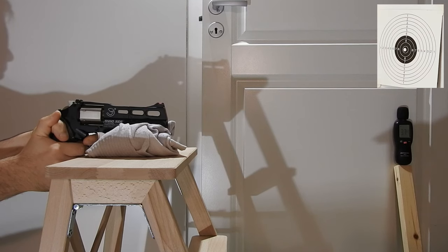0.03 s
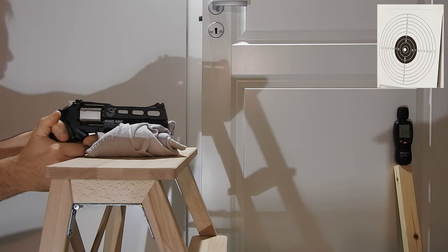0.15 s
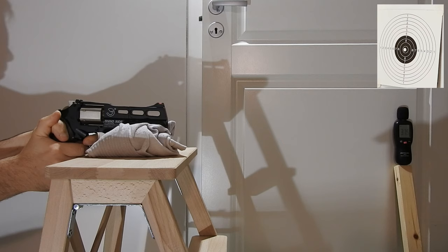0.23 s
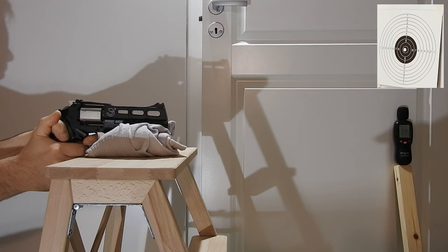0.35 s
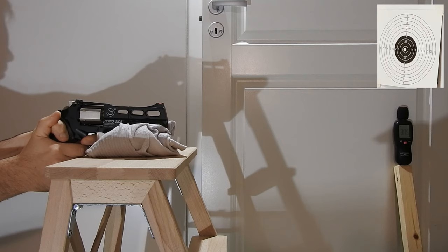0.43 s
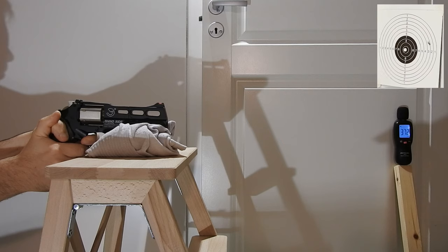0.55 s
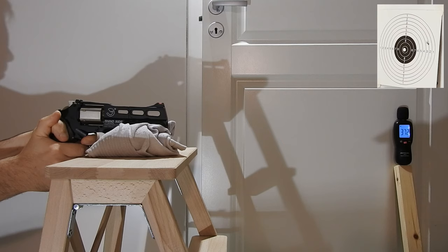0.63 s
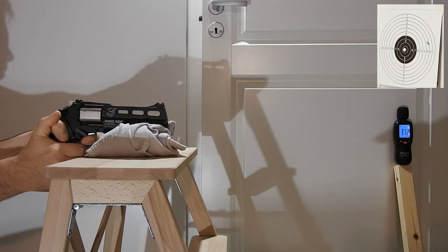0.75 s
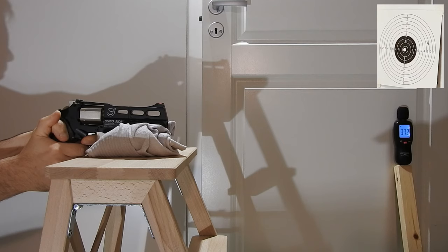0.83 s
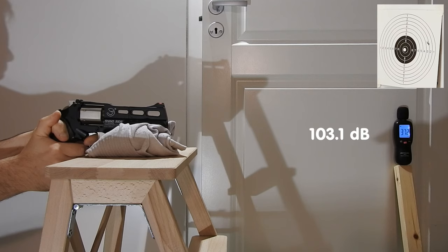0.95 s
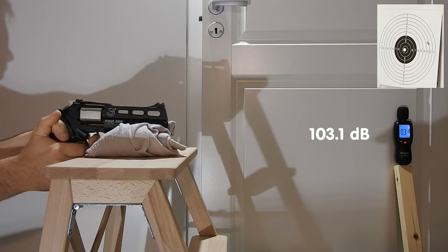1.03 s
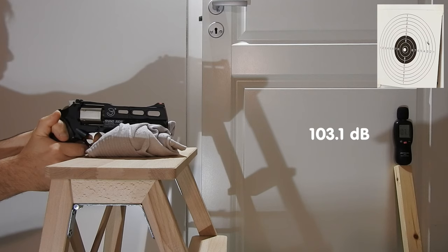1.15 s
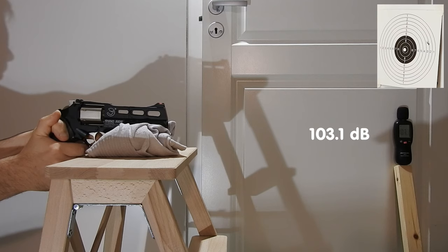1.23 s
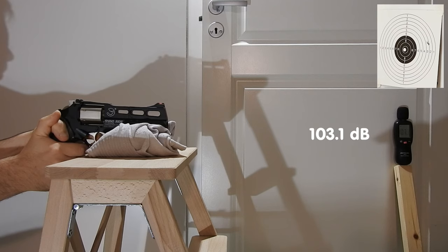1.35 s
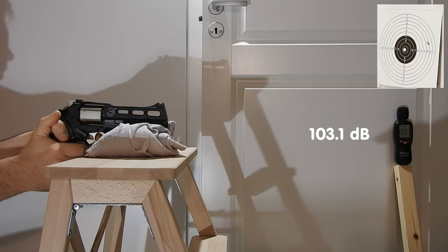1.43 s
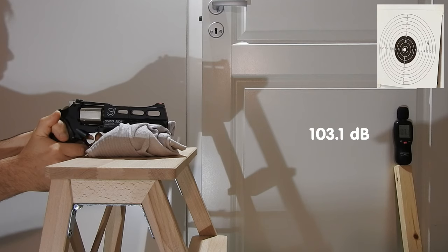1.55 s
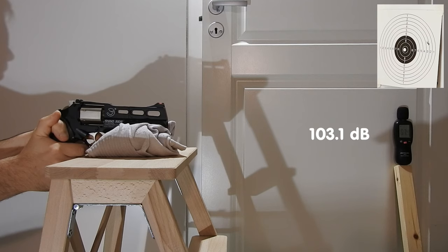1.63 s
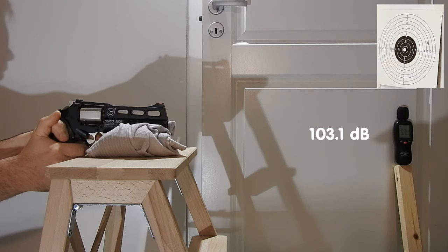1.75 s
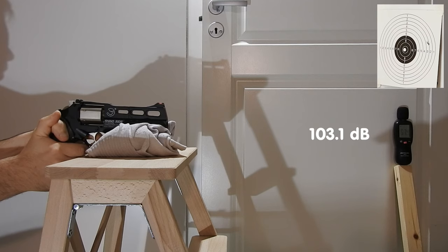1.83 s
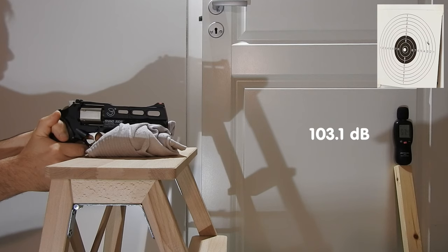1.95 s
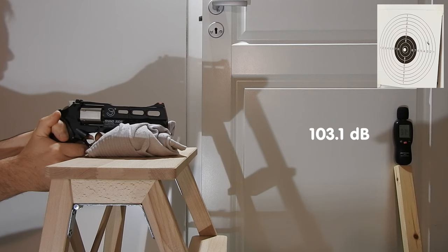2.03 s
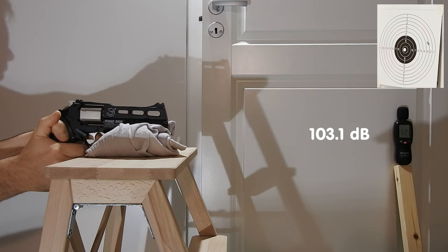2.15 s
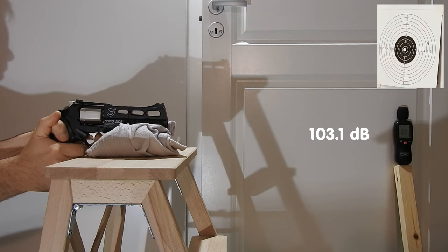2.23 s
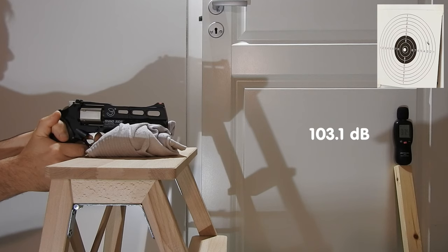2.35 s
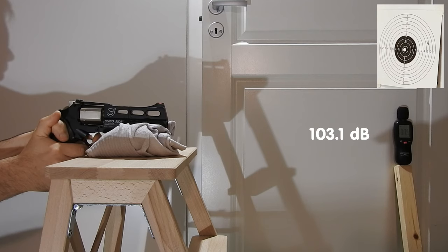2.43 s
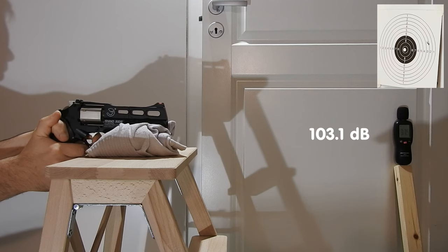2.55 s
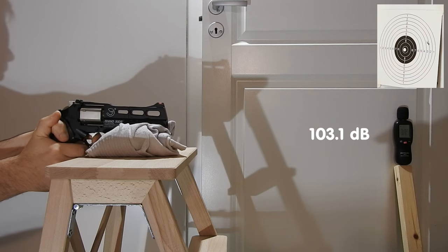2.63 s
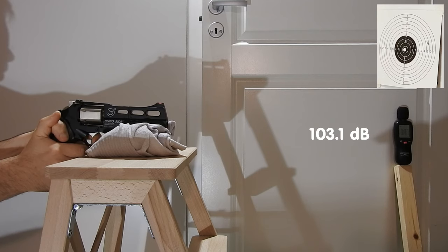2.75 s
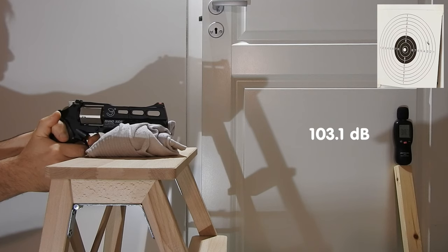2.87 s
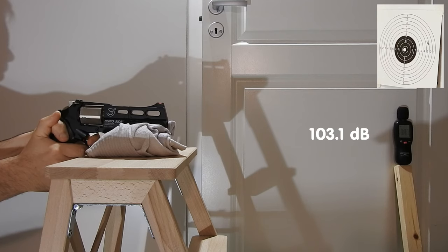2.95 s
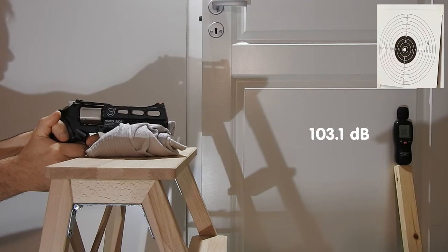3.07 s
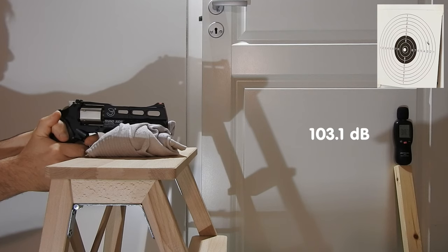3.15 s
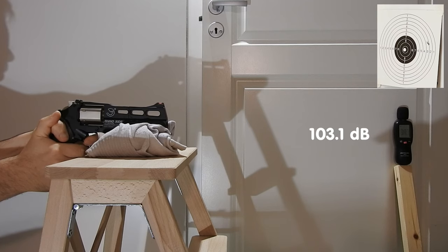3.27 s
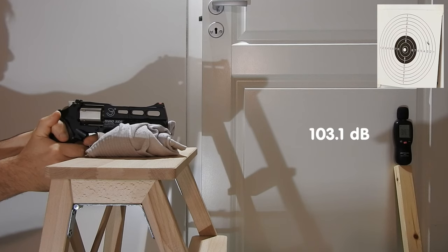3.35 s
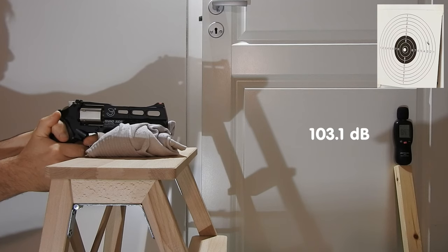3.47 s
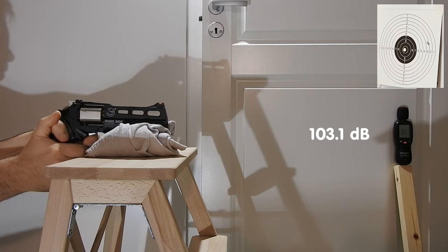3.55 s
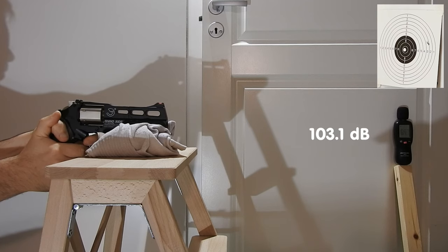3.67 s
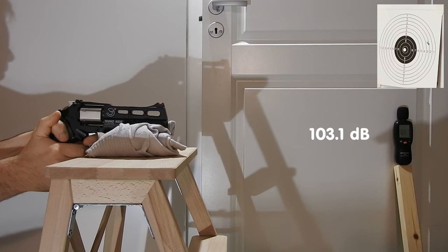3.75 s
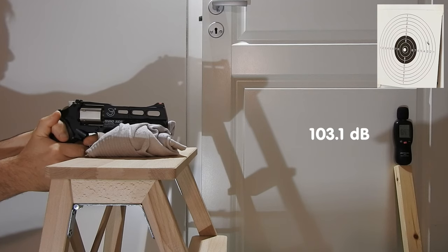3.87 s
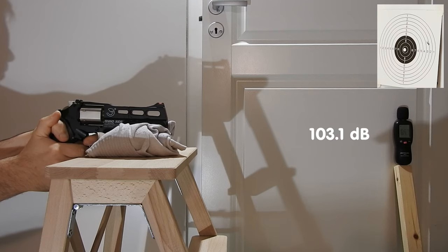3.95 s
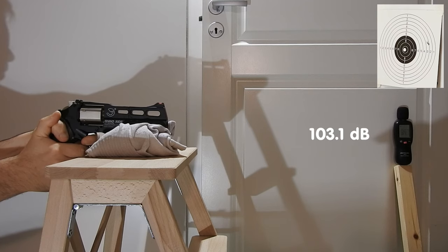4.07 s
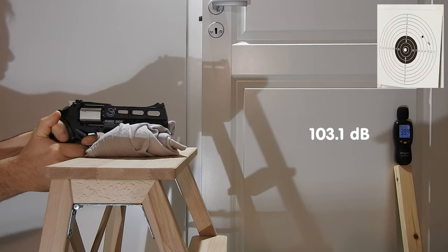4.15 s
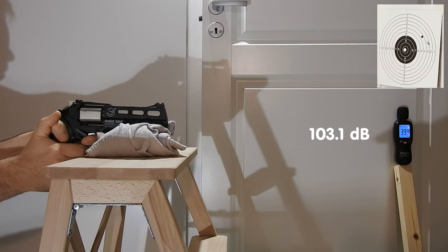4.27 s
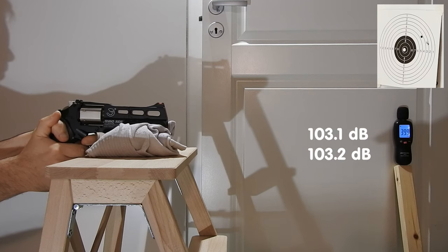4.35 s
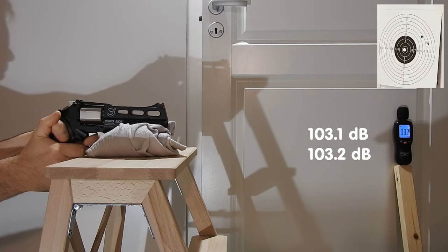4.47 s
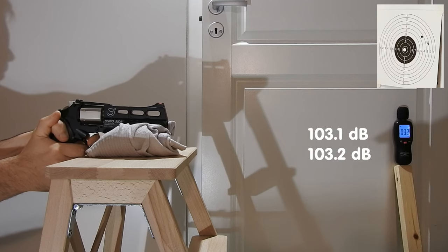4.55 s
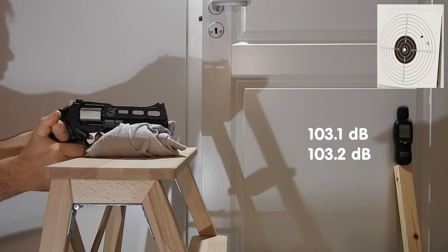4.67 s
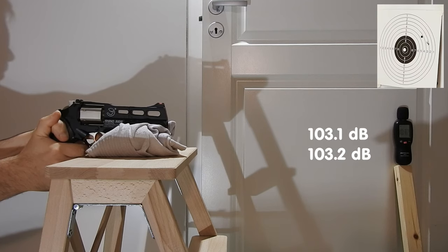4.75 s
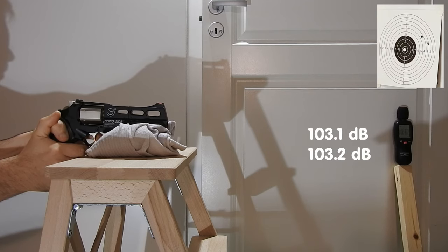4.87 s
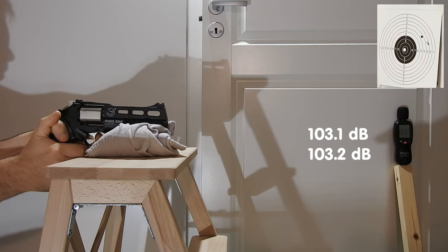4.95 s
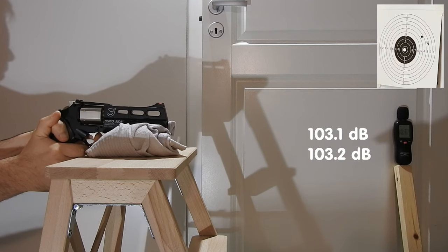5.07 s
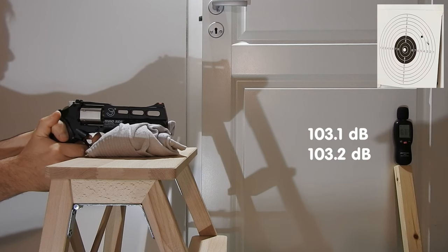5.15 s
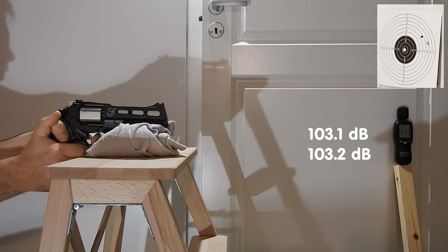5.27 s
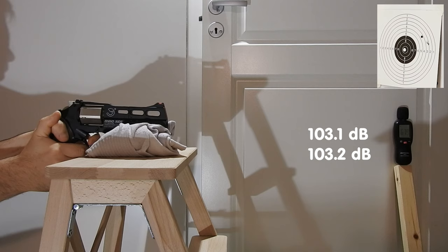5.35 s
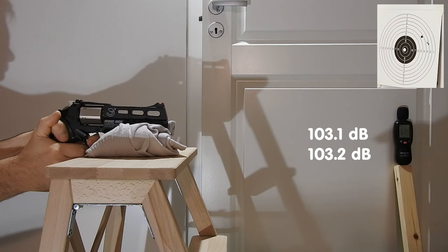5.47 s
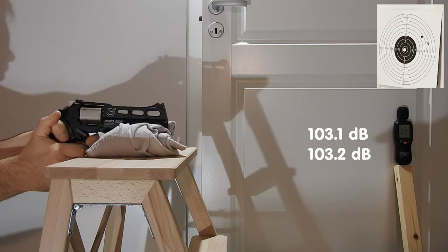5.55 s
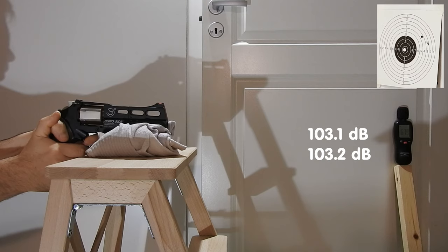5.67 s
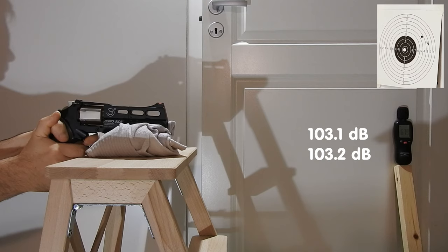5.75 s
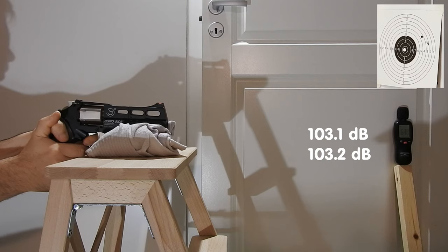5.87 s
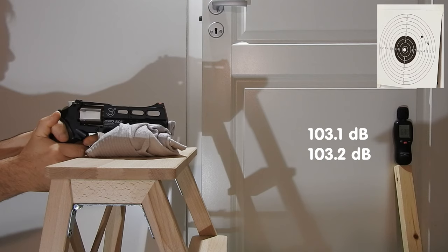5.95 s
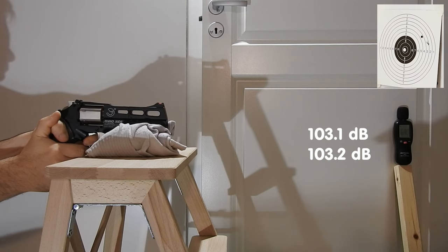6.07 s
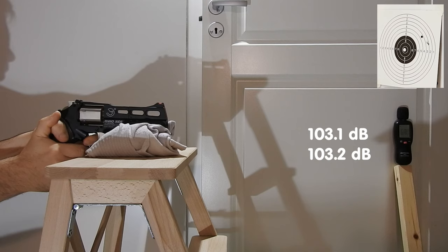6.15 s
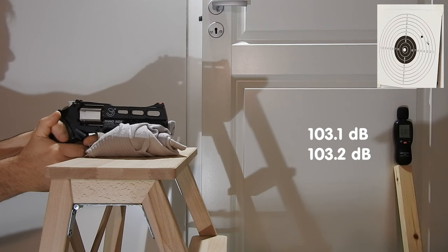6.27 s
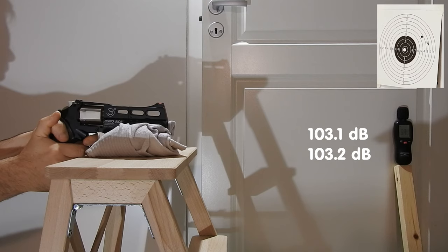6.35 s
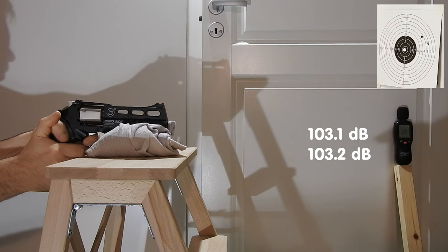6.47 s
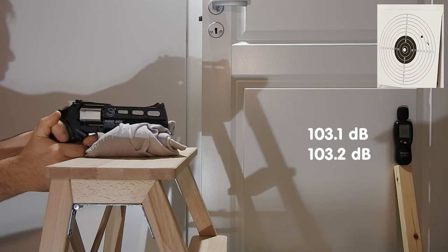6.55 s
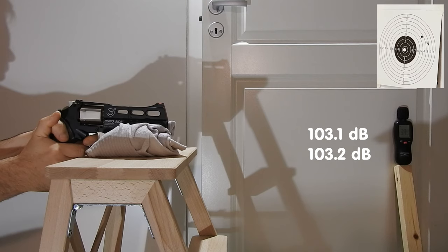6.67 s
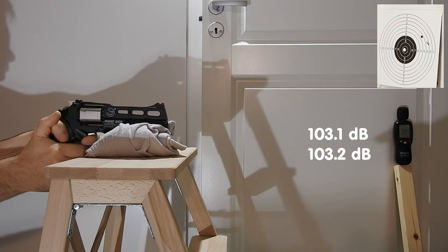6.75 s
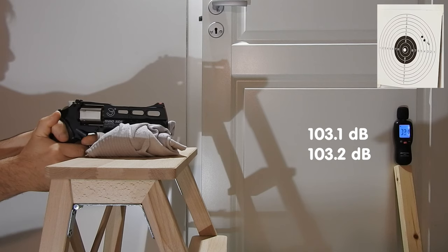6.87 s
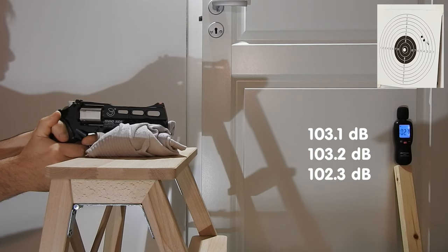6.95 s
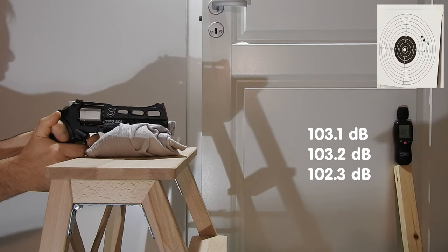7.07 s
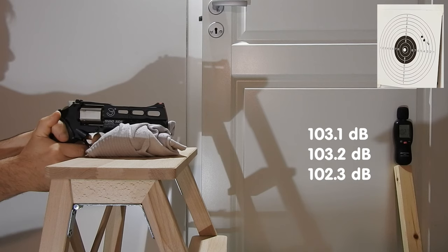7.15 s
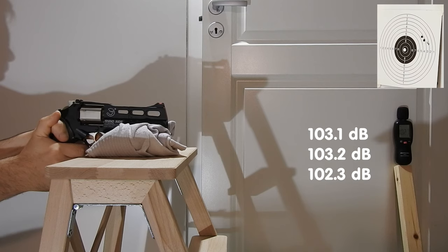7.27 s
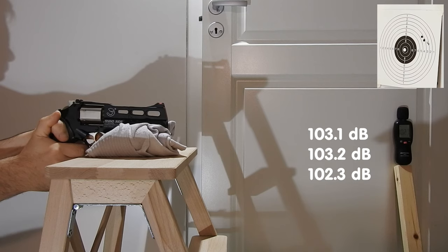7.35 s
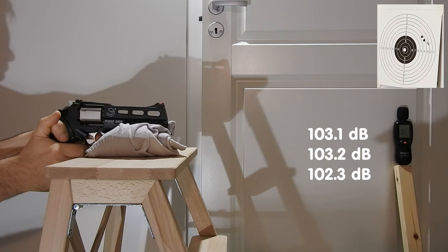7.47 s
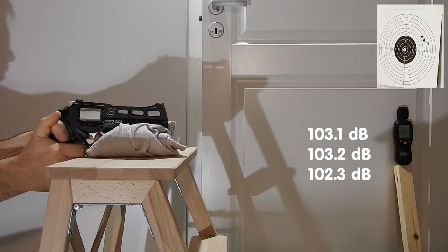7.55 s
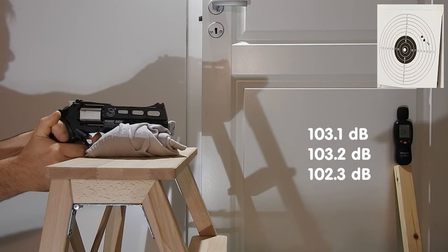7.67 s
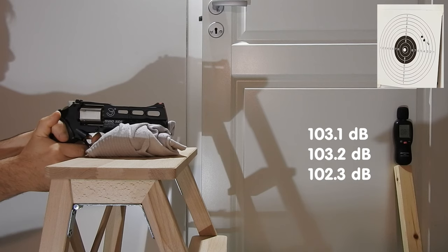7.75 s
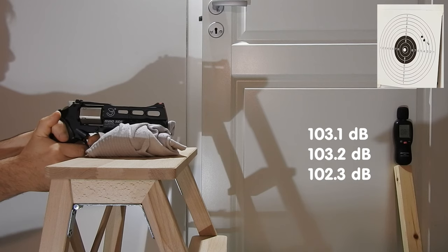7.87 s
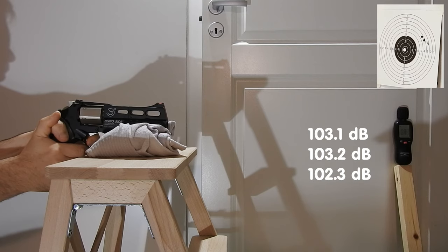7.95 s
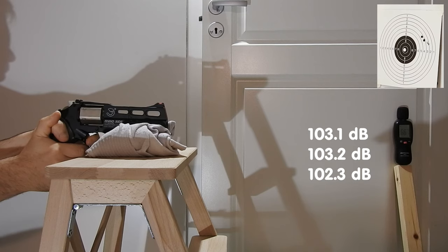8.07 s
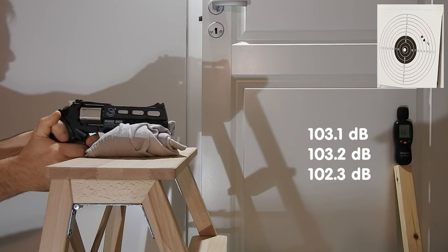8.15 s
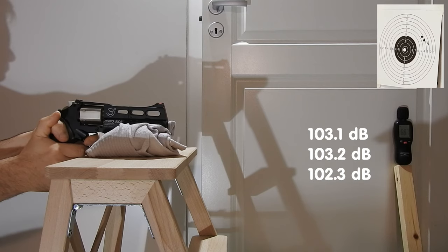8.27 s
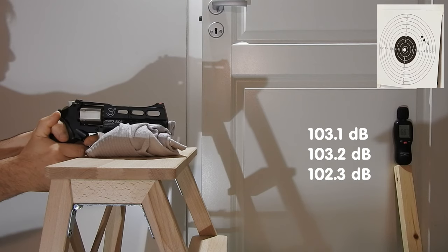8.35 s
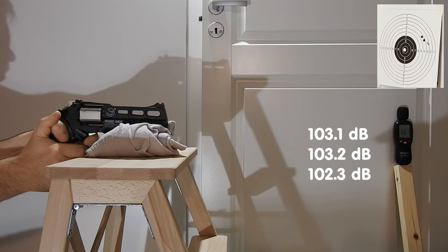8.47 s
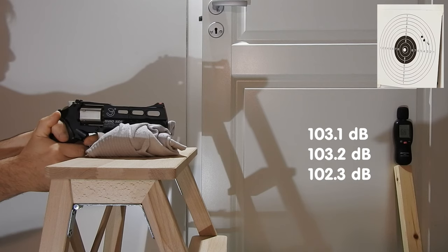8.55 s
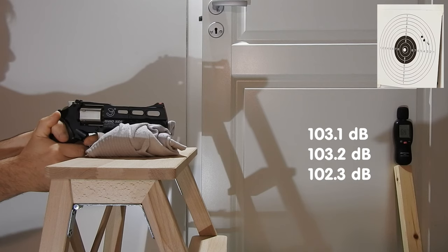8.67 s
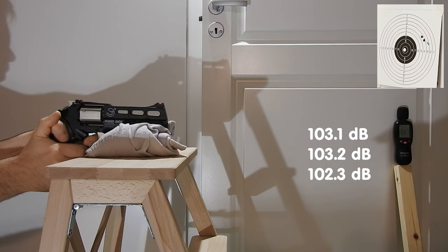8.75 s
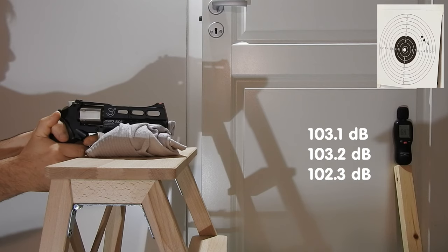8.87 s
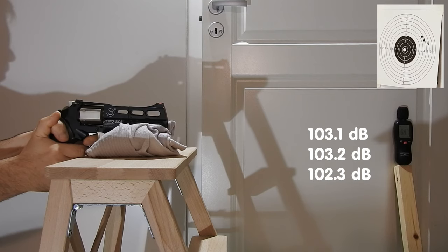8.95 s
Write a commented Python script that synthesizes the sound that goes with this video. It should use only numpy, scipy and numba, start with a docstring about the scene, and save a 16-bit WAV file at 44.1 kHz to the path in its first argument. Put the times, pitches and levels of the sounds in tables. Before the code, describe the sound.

A gas-powered revolver is fired and cocked close to a stereo microphone in a small bare room, over very quiet, steady ventilation hush. At about 0.45 s a violent, bright crack bursts out, slightly preceded by a hammer knock, with an air push, a dull stool thud and booming low resonances; it is squashed and clipped, with dense early echoes and a half-second tail. Faint trigger ticks at 1.0 lead to a dry clack at 1.17. A short scrape and ringing cylinder-lock click come at 2.86, a steel full-cock click at 3.2. The second shot hits at 4.06, trigger clack at 4.7, cocking clicks at 5.4 and 5.65, with tiny handling ticks around them. The third shot comes at 6.77, clack at 7.2, cocking clicks at 7.9 and 8.3, each answered by the room, then only hush.

```python
"""A gas-powered revolver on a stool fires three shots in a small bare room, close enough to overload the recorder.
Each shot is a hammer knock, a gas burst, a push of air, a thud in the stool and booming room modes.
After each shot the trigger resets and the hammer is cocked in two main steel clicks: a snap plus brief rings.
Echoes and a diffuse tail answer every snap and blast; a soft ventilation hush of filtered noise lies under it all.
The recorder splits the sound into two bands, limits it twice, clips it and cuts the top treble."""
import sys
import numpy as np
from scipy import signal
from scipy.fft import rfft, irfft, next_fast_len
from scipy.io import wavfile
from scipy.ndimage import uniform_filter1d, minimum_filter1d
from numba import njit

SR = 44100
rng = np.random.default_rng(int(sys.argv[2]) if len(sys.argv) > 2 else 0)


def log_audio(samples):
    """Write samples as a 16-bit WAV file to the path given in sys.argv[1]."""
    # one column per channel
    frames = np.atleast_2d(samples).T
    # limit to full scale, then quantise
    limited = np.clip(frames, -1, 1)
    pcm = np.round(limited * 32767).astype(np.int16)
    wavfile.write(sys.argv[1], SR, pcm)


N = 397341


def amp(db):
    """Decibels to an amplitude factor."""
    return 10 ** (np.asarray(db) / 20)


def unit(x):
    """The signal at an rms of 1."""
    return x / np.sqrt(np.mean(x ** 2) + 1e-20)


def along(points, hz):
    """Reads a curve of (f/Hz, value) points on a log frequency axis."""
    f, value = np.transpose(points)
    return np.interp(np.log(hz + 1), np.log(f + 1), value)


def filtered(x, response):
    """Multiplies the spectrum of x by a response of frequency."""
    size = next_fast_len(x.shape[-1] + 8192)
    hz = np.fft.rfftfreq(size, 1 / SR)
    return irfft(rfft(x, size) * response(hz), size)[..., :x.shape[-1]]


def impulse(gain_db, size=4096):
    """The causal minimum-phase pulse of energy 1 that has this spectral shape."""
    hz = np.fft.rfftfreq(size, 1 / SR)
    cepstrum = irfft(np.log(amp(gain_db(hz)) + 1e-6), size)
    # folding the cepstrum forward makes the pulse causal
    cepstrum[1:size // 2] *= 2
    cepstrum[size // 2 + 1:] = 0
    pulse = irfft(np.exp(rfft(cepstrum)), size)
    return pulse / np.linalg.norm(pulse)


def spread(pair, likeness):
    """Mixes two unrelated signals into left and right of the given likeness at each frequency."""
    def mid_side(hz):
        turn = np.arccos(np.clip(along(likeness, hz), -1, 1)) / 2
        return np.array([np.cos(turn), np.sin(turn)])

    mid, side = filtered(pair, mid_side)
    return np.array([mid + side, mid - side])


def add(out, s, sound):
    """Lays a stereo sound into out at s seconds."""
    part = out[:, round(s * SR):][:, :sound.shape[1]]
    part += sound[:, :part.shape[1]]


def hush():
    """Distant air handling: steady coloured noise with shallow patches of random gain in time and frequency."""
    # colour of the air noise: f/Hz, relative level/dB
    colour = [(12, -56.5), (20, -10.5), (22, -28), (40, -4.5), (85, 0.5), (345, -8), (385, -0.5),
              (482, -8.5), (524, -6), (655, -8.5), (1050, -9.5), (1500, -15.5), (2600, -20), (4200, -20),
              (5940, -18.5), (7630, -24.5), (15800, -36.5)]
    # how alike the two microphones hear it: f/Hz, left-right likeness [1 = identical]
    hush_likeness = [(60, 0.082), (180, 0.87), (550, 0.037), (1650, 0.5), (4970, 0.2), (15000, 0.0)]
    z = signal.stft(rng.standard_normal((2, N)), nperseg=512)[2]
    field = uniform_filter1d(rng.standard_normal(z.shape[1:]), size=4, axis=0)
    field = uniform_filter1d(field, size=12, axis=1)
    patchy = z * amp(0.85 * unit(field))
    pair = signal.istft(patchy, nperseg=512)[1][:, :N]
    coloured = filtered(pair, lambda hz: amp(along(colour, hz)))
    return amp(-52) * unit(spread(coloured, hush_likeness))


def room(sound, tail_db, rise):
    """The sound itself, its first echoes and a fresh diffuse tail in which each frequency dies at its own speed."""
    # dying away of the small room: f/Hz, t60/s
    decay = [(60, 0.47), (250, 0.57), (1000, 0.41), (2500, 0.49), (6000, 0.42), (10000, 0.32), (15000, 0.2)]
    # how alike the two microphones hear the tail: f/Hz, left-right likeness [1 = identical]
    tail_likeness = [(60, 1), (180, 1), (550, 0.94), (1650, 0.95), (4970, 0.68), (9000, 0.75),
                     (15000, 0.11)]
    # first echoes off the walls: mean delay/s, mean level/dB before the treble loss
    walls = [(.0012, -1), (.003, -6), (.0078, -4), (.0088, -3.5), (.0098, -1), (0.0133, -5), (0.0173, -7.5),
             (.021, -10), (.037, -8), (0.042, -12)]
    hz, t, z = signal.stft(rng.standard_normal((2, SR)), SR, nperseg=256)
    dying = z * amp(-60 * t / along(decay, hz)[:, None])
    tail = signal.istft(dying, SR, nperseg=256)[1][:, :SR]
    build_up = 1 - np.exp(-(np.arange(SR) / SR / rise) ** 2)
    tail = spread(tail, tail_likeness) * build_up
    echoes = np.zeros((2, SR))
    for s, db in walls:
        delays = s + .0002 * rng.standard_normal(2)  # slightly different at each microphone
        at = np.clip(np.round(delays * SR), 1, SR - 1).astype(int)
        echoes[[0, 1], at] += amp(db + 1.0 * rng.standard_normal(2))
    answer = amp(tail_db) * tail / np.linalg.norm(tail[0])
    answer += filtered(echoes, lambda hz: 1 / (1 + (hz / 9000) ** 4))  # the walls swallow the highest treble
    answer[[0, 1], [0, 1]] += 1  # the left microphone is a hair nearer: one sample
    return signal.fftconvolve(sound[None], answer, axes=1)


def ring(modes, t, scatter_db, detune, rise):
    """Decaying modes (f/Hz, level/dB, t60/s) at newly drawn strengths, pitches and phases."""
    hz, db, t60 = np.transpose(modes)[..., None]
    level, pitch, phase = rng.standard_normal((len(modes), 3)).T[..., None]
    decay = amp(db + scatter_db * level - 60 * t / t60)
    waves = decay * np.sin(2 * np.pi * (hz * (1 + detune * pitch) * t + phase))
    return waves.sum(axis=0) * (1 - np.exp(-t / rise))


def burst(pulse, t60, rattle_db):
    """A pulse scaled to peak 1 with a weaker, dying rattle of its own colour behind it."""
    t = np.arange(SR // 20) / SR
    blows = amp(rattle_db - 60 * t / t60) * rng.standard_normal(len(t))
    blows[0] = 1
    return signal.fftconvolve(blows, pulse / np.abs(pulse).max())


def contact(spectrum, dull_db):
    """A sharp steel-on-steel snap whose lower part, the knock, has a strength of its own."""
    pulse = impulse(lambda hz: along(spectrum, hz) + dull_db / (1 + (hz / 3800) ** 8))
    return burst(pulse, .004, rattle_db=-26)


CLICK_RISE_S = .011  # time the diffuse answer to a click needs to build up


def trigger():
    """The released trigger ticks past two catches, each tick with a rebound; resets are single unpitched clacks."""
    # colour of the trigger snap: f/Hz, relative level/dB
    snap_colour = [(400, -54.5), (900, -43), (1500, -23), (2200, -22), (2800, -25), (3800, -16),
                   (4500, -10.5), (5300, -8.5), (6300, 0), (7500, -10.5), (9500, -21), (12000, -26),
                   (15800, -38.5)]
    # ticks past the catches: first t/s, second t/s, level of the first/dB
    catch_ticks = [(0.9978, 1.0402, -25), (4.5358, 4.5824, -25)]
    # clacks of the reset: t/s, level/dB
    resets = [(1.1680, 0), (4.6885, 0), (7.2065, 0)]
    first_dull_db, second_dull_db, reset_dull_db = -2.5, 6, 1.5
    second_db = 5.5  # second tick over the first
    rebound_s, rebound_db = 0.0043, 0.5  # delay and level of the rebound against its tick
    snaps = []
    for first, second, db in catch_ticks:
        for s, tick_db, dull_db in ((first, db, first_dull_db), (second, db + second_db, second_dull_db)):
            snaps.append((s, tick_db, dull_db))
            snaps.append((s + rebound_s, tick_db + rebound_db, dull_db))
    snaps += [(s, db, reset_dull_db) for s, db in resets]
    out = np.zeros((2, N))
    for s, db, dull_db in snaps:
        add(out, s, amp(db) * room(contact(snap_colour, dull_db), tail_db=2.5, rise=CLICK_RISE_S))
    return out


def contacts():
    """Every touch of steel while cocking: t/s, level/dB, (knock, sear, cylinder and frame in dB)."""
    # faint ticks of the hand working the gun: t/s, level/dB, knock level/dB
    take_up = [(2.1131, -43.5, 27), (3.1412, -32, 7), (5.1923, -42, 22), (5.2123, -36, 18),
               (5.3099, -46, 3), (7.7228, -38, 11), (7.7421, -29, 12)]
    # rings behind a faint tick: level/dB of sear, cylinder, frame
    faint_ring_db = (-28.5, -18.5, -30.5)
    # the cylinder turns and locks: t/s, level/dB, lead of the bolt's first touch/s, sear ring level/dB
    locks = [(2.8596, 1, .0106, -25), (5.3762, 0.5, .0122, -30), (7.9128, 0, .0105, -18)]
    # the hammer reaches full cock: t/s, level/dB, lead of the sear's first touch/s, touch level/dB,
    # sear ring level/dB
    catches = [(3.2001, 0, .0105, -18, -17), (5.6465, 0, .009, -21, -23), (8.3289, 1, .0088, -13, -17)]
    # levels in dB of knock, sear, cylinder, frame
    lock_touch, catch_touch = (1.5, -18.5, -15, -33), (13, -17.5, -30, -41)
    lock_dull_db, lock_cylinder_db, lock_frame_db = -5.5, -17.5, -16.5
    catch_dull_db, catch_cylinder_db, catch_frame_db = -7.5, -32, -19
    touch_under_lock_db = -14
    # the turning cylinder drags ever louder before the touch; levels are against the lock click
    slips, scrape_s, scrape_from_db, scrape_to_db = 4, .017, -43, -26.5
    rows = [(s, db, (dull_db, *faint_ring_db)) for s, db, dull_db in take_up]
    for s, db, lead, sear_db in locks:
        touch_s = s - lead
        way = (np.arange(slips) + 0.2 * rng.random(slips)) / slips
        for u in way:
            slip_db = db + scrape_from_db + u * (scrape_to_db - scrape_from_db)
            rows.append((touch_s - scrape_s * (1 - u), slip_db, lock_touch))
        rows.append((touch_s, db + touch_under_lock_db, lock_touch))
        rows.append((s, db, (lock_dull_db, sear_db, lock_cylinder_db, lock_frame_db)))
    for s, db, lead, touch_db, sear_db in catches:
        rows.append((s - lead, touch_db, catch_touch))
        rows.append((s, db, (catch_dull_db, sear_db, catch_cylinder_db, catch_frame_db)))
    return rows


def cocking():
    """Each steel contact snaps and also rings the sear, the cylinder and the frame for a moment."""
    # colour of the cocking snap: f/Hz, relative level/dB
    clack_colour = [(300, -50.5), (700, -32), (1500, -22.5), (2400, -16.5), (3100, -12.5), (4500, -7.5),
                    (5300, -4), (6200, -1.5), (7200, -4), (9000, -15), (11400, -23.5), (13000, -37.5),
                    (15800, -38.5)]
    # ringing modes of the three steel parts: mean f/Hz, relative level/dB, t60/s
    sear = [(3617, -5.5, 0.014), (3744, -6, 0.016)]
    # the same columns: mean f/Hz, relative level/dB, t60/s
    cylinder = [(5870, -5, 0.018), (6080, -1, .018), (6226, 1, 0.016), (7760, -4, .016), (7860, -4, 0.028)]
    # the same columns: mean f/Hz, relative level/dB, t60/s
    frame = [(10070, -9.5, .015), (10160, -6, .02), (10240, -8.5, .02), (15200, -29.5, .03)]
    out, t = np.zeros((2, N)), np.arange(SR // 4) / SR
    for s, db, (dull_db, *ring_db) in contacts():
        sound = np.zeros(len(t))
        for level_db, part in zip(ring_db, (sear, cylinder, frame)):
            sound += amp(level_db) * ring(part, t, scatter_db=6.0, detune=0.0018, rise=0.000039)
        snap = contact(clack_colour, dull_db)
        sound[:len(snap)] += snap
        add(out, s, amp(db) * room(sound, tail_db=2.5, rise=CLICK_RISE_S))
    return out


def shots():
    """The hammer falls on the valve; gas bursts out, pushes the air, thuds into the stool and booms in the room."""
    # the shots: t/s, blast level/dB, hammer fall level/dB, muzzle push level/dB
    firings = [(0.4486, 31.5, -23, 17), (4.063, 33, -20, 15.5), (6.771, 31, -23, 13)]
    # colour of the gas burst: f/Hz, relative level/dB
    blast_colour = [(25, -64.5), (60, -40), (200, -26), (450, -30), (1000, -16.5), (1900, -23),
                    (3200, -16.5), (3900, -12.5), (4600, -9.5), (5700, -2.5), (6700, -0.5), (7800, -11),
                    (10000, -22), (12500, -29.5), (15800, -44.5)]
    # the recoil in the stool: f/Hz, level under the muzzle push/dB, t60/s
    stool = [(135, -9, 0.15), (238, -15, .07)]
    # room modes: mean f/Hz, relative level/dB, t60/s
    room_modes = [(82, -13, 0.75), (102, -10.5, 0.23), (118.5, 0, 0.37), (159.3, -20, 0.86),
                  (203.4, 0, 0.41), (240, 0, 0.12), (311, -8, 0.43), (495, -16, 0.48), (918, -18.5, 0.56),
                  (1345, -28, 0.94), (1500, -28, 0.82)]
    knock_colour = [(100, -23.5), (800, 8.5), (3500, -2), (7000, -5.5), (15000, -29)]  # f/Hz, relative level/dB
    out, t = np.zeros((2, N)), np.arange(int(1.5 * SR)) / SR
    gas = impulse(lambda hz: along(blast_colour, hz))
    gas = -gas / np.abs(gas).max()
    knock = impulse(lambda hz: along(knock_colour, hz))
    # the push is a rounded dip with a small hump before and a larger one after
    u = (t[:SR // 100] - .002) / 0.00028
    push = (u * u - 1) * np.exp(-u * u / 2) * np.where(u < -1, .06, 1)
    push -= push.mean()
    thud = -sum(amp(db - 60 * t / t60) * np.cos(2 * np.pi * hz * t) for hz, db, t60 in stool)
    thud *= 1 - np.exp(-t / .0005)
    for s, blast_db, hammer_db, push_db in firings:
        hammer = burst(knock, 0.06, rattle_db=-3.0)
        add(out, s - .0105, amp(hammer_db) * room(hammer, tail_db=16.5, rise=0.0073))
        add(out, s, amp(blast_db) * room(gas, tail_db=14.5, rise=.001))
        add(out, s - .0022, amp(push_db) * room(push, tail_db=-0.5, rise=0.0034))
        add(out, s - .0005, amp(push_db) * np.array([thud, thud]))
        boom = ring(room_modes, t, scatter_db=1, detune=.003, rise=.003)
        # a weaker part stands opposite in the two microphones
        sideways = ring(room_modes, t, scatter_db=3, detune=.003, rise=.003) * [[1], [-1]]
        add(out, s, amp(blast_db - 29.5) * (boom + amp(-24) * sideways))
    return out


def scene():
    """The gun's shots, trigger and cocking over the ventilation hush."""
    return shots() + trigger() + cocking() + hush()


@njit
def follow(level, rise, fall):
    """A one-pole meter with separate rates per sample for rising and falling."""
    out, held = np.empty_like(level), 0.0
    for i in range(len(level)):
        held += (level[i] - held) * (rise if level[i] > held else fall)
        out[i] = held
    return out


def limit(x, top_db, attack, release):
    """Turns the gain down by the smoothed number of dB by which the nearby peak stands above top_db."""
    peak = -minimum_filter1d(-np.abs(x).max(axis=0), size=24)  # the loudest of 24 samples
    over_db = np.maximum(20 * np.log10(peak + 1e-9) - top_db, 0)
    rise, fall = min(1 / (attack * SR), 1), min(1 / (release * SR), 1)  # attack and release in s
    return x * amp(-follow(over_db, rise, fall))


def record(dry):
    """Two bands, the lower ahead of the upper; a bass cut, a slow and a quick limiter, clipping, a treble limit."""
    split_hz, lead_s, bass_cut_hz, top_hz = 4063, .0105, 28, 15924

    def bands(hz):
        low = 1 / (1 + (hz / split_hz) ** 32)
        early = np.exp(2j * np.pi * hz * lead_s)
        bass_cut = (1j * hz / (1j * hz + bass_cut_hz)) ** 2
        return (low * early + 1 - low) * bass_cut

    x = filtered(dry, bands)
    x = limit(x, top_db=-2.5, attack=.003, release=0.029)
    x = limit(x, top_db=1, attack=.0001, release=.002)
    x = x / (1 + np.abs(x) ** 8) ** (1 / 8)  # clipping with a rounded knee
    return filtered(x, lambda hz: hz < top_hz)


dry = scene()
out = record(dry)
log_audio(out)
```